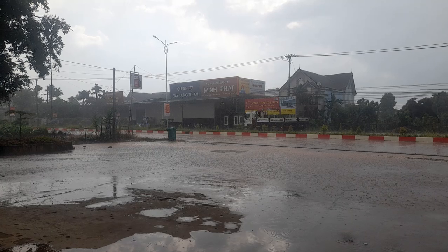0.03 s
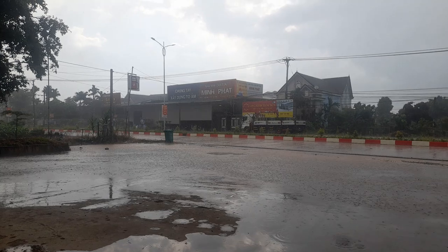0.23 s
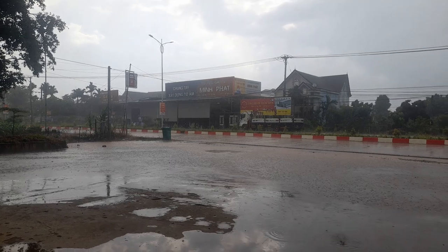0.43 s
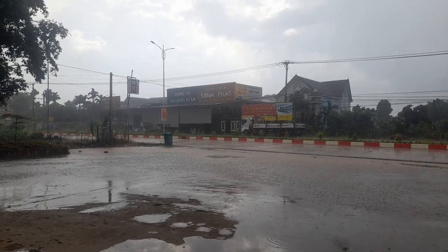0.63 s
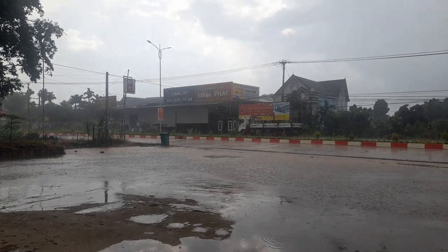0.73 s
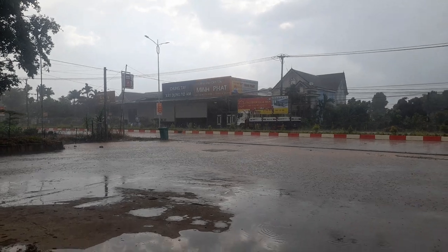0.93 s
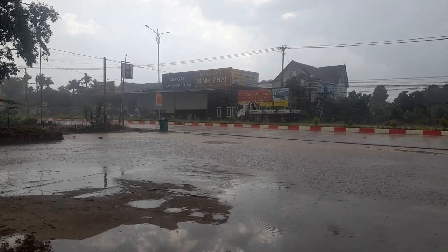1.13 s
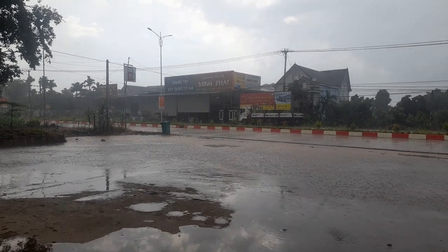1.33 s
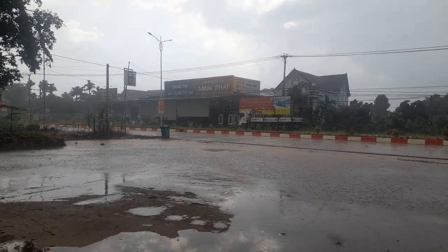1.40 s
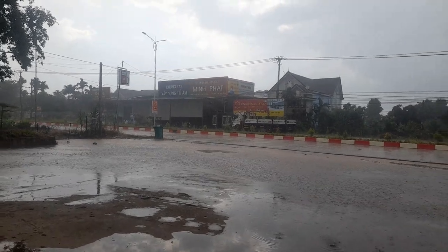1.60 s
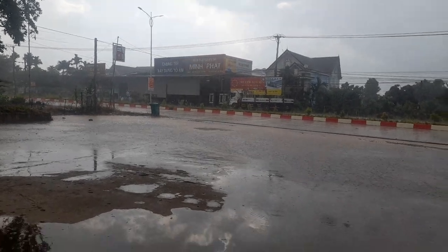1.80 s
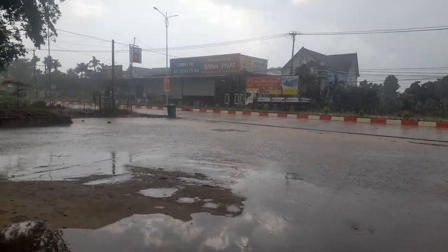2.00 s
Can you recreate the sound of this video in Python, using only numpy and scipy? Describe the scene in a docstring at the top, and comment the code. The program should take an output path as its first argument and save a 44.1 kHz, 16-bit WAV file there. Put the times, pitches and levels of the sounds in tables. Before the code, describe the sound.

Heavy rain hisses steadily on a flooded road, with a low rumble underneath.

```python
"""A wide hiss of heavy rain on a flooded road, heard from its edge on a small stereo microphone.
Countless far drops merge into the hiss, nearer ones tick on the water, a few big ones splash close by.
A low rumble lies underneath, and gusts buffet the microphone, mostly its left port.
Near the end comes one dull thump, and the treble fades on the right."""
import sys
import numpy as np
from scipy import signal
from scipy.fft import rfft, irfft
from scipy.io import wavfile
from scipy.ndimage import uniform_filter1d

SR = 44100
rng = np.random.default_rng(int(sys.argv[2]) if len(sys.argv) > 2 else 0)


def int16_out(signal):
    """Quantize to a 16-bit WAV file."""
    q = np.round(np.clip(np.atleast_2d(signal).T, -1, 1) * 32767)
    wavfile.write(sys.argv[1], SR, q.astype(np.int16))


N = 90449

# spectrum of rain on water at each port: frequency_hz, relative_db
RAIN_SPECTRUM_LEFT = [(100, -16), (450, -6), (750, -2), (1050, 0), (1400, -3), (2400, -5.5), (4500, -8),
                      (6200, -10.5), (7500, -9.5), (9100, -12), (11500, -10), (13800, -9.5), (16000, -14)]
RAIN_SPECTRUM_RIGHT = [(100, -34), (450, -5.5), (750, 1.5), (1100, -.5), (2500, -1.5), (3800, -2.5),
                       (5000, -4.5), (7500, -6.5), (8200, -9.5), (9000, -10), (9900, -6.5), (11200, -12),
                       (13800, -10.5), (16000, -16.5)]
# strength of the rain: time_s, gain_db
RAIN_STRENGTH = [(.07, 1.04), (.7, 0.9), (.9, 0.5), (1.1, 0), (1.33, 0.67), (1.68, 0.8), (1.85, 0.35),
                 (2.05, 0.5)]
# the rain's treble at the right port: time_s, gain_db
RIGHT_TREBLE_GAIN = [(.07, 1), (.4, -1.3), (1.1, 0.5), (1.35, 1.7), (1.72, 2), (1.85, -1), (1.95, -2.5),
                     (2.05, -9)]
# spectrum of the distant rumble: frequency_hz, relative_db
RUMBLE_SPECTRUM = [(15, -55), (30, -26), (50, -9.5), (100, -4.5), (160, -2.5), (250, 0), (340, -4),
                   (440, -7.5), (600, -5), (760, -4), (900, -9), (1100, -22), (2500, -34.5)]
# likeness of the rumble at the two ports: frequency_hz, correlation (0-1)
RUMBLE_LIKENESS = [(50, .6), (200, 0.92), (400, 0.93), (750, 0.5), (1200, 0.2)]
# spectrum of wind on the microphone: frequency_hz, relative_db
WIND_SPECTRUM = [(15, -50), (30, -16), (52, -2.5), (90, -4.5), (145, 2.5), (210, -9.5), (320, -11.5),
                 (600, -29), (1500, -35.5), (5000, -55)]
# gusts on the microphone: peak_s, half_length_s, left_db, right_db
WIND_GUSTS = [(0.135, 0.012, -17.5, -33), (0.184, .02, -12.5, -48), (0.267, 0.024, -24.5, -32),
              (0.611, 0.044, -17.5, -31.5), (0.689, 0.029, -16, -24), (0.759, 0.027, -21, -36),
              (1.022, 0.017, -24.5, -48), (1.789, 0.014, -18.5, -42), (1.87, 0.053, -31.5, -28),
              (1.966, 0.012, -19.5, -37), (2.036, .014, -21.5, -32)]
# big drops close by: start_s, relative_db, pitch_hz, left_minus_right_db
CLOSE_SPLASHES = [(.1453, -22, 12600, 6), (0.2754, -11, 6050, -4.5), (.5329, -22, 7800, 0),
                  (.6021, -22, 9400, 2), (.609, -22, 9200, -5), (.684, -18, 11400, 3),
                  (.6874, -20, 3600, -5), (.7069, -18, 5300, 0), (1.0327, -17, 13000, 3),
                  (1.165, -13.5, 7500, -5), (1.2784, -18.5, 3800, -5), (1.3617, -16.5, 3900, -5),
                  (1.5963, -22, 10200, -3)]

HISS_DB, DROPS_DB = -27, -38.5  # before the rain's strength and treble gain
RUMBLE_DB, SPLASH_GAIN_DB = -30.5, -4.5
BREEZE_LEFT_DB, BREEZE_RIGHT_DB = -38.5, -45  # between gusts


def amp(db):
    """Decibels to gain."""
    return 10 ** (np.asarray(db) / 20)


def unit(x):
    """Scales to rms 1."""
    return x / np.sqrt(np.mean(x ** 2) + 1e-20)


def per_bin(table):
    """Reads a table at every FFT bin, on a log-frequency axis."""
    hz, value = np.transpose(table)
    return np.interp(np.log(np.fft.rfftfreq(N, 1 / SR) + 1), np.log(hz + 1), value)


def gain_curve(table):
    """Turns a table of decibels over time into a gain at every sample."""
    return amp(np.interp(np.arange(N) / SR, *np.transpose(table)))


def colour(x, spectrum):
    """Filters a signal by a spectrum table."""
    return irfft(rfft(x) * amp(per_bin(spectrum)), N)


def drift(shape, bins, frames):
    """Random field, smooth over neighbouring bins and frames."""
    across_bins = uniform_filter1d(rng.standard_normal(shape), bins, axis=0)
    return unit(uniform_filter1d(across_bins, frames, axis=1))


def on_water(pair):
    """Gives each port its colour of rain on water."""
    return unit(np.array([colour(pair[0], RAIN_SPECTRUM_LEFT), colour(pair[1], RAIN_SPECTRUM_RIGHT)]))


def far_hiss(flutter_db=0.57, patchy_db=0.86):
    """Drops far out on the road merge into noise that flutters and comes in patches."""
    noise = signal.stft(rng.standard_normal((2, N)), nperseg=256)[2]
    flutter = drift((1, noise.shape[2]), bins=1, frames=12)
    patches = np.array([drift(port.shape, bins=14, frames=12) for port in noise])
    uneven = noise * amp(flutter_db * flutter + patchy_db * patches)
    return amp(HISS_DB) * on_water(signal.istft(uneven)[1][:, :N])


def near_drops(drops_per_s=1800, spread_db=4.5, decay_cycles=0.88, pitches=32):
    """Nearer drops tick on the water all around the microphone, each a few cycles long."""
    t, out = np.arange(256) / SR, np.zeros((2, N))
    sizes = amp(spread_db * np.minimum(rng.exponential(1, N), 4.4))  # many faint, few loud
    impacts = sizes * (rng.random(N) < drops_per_s / SR)
    pitch_index = rng.integers(0, pitches, N)
    for k, hz in enumerate(np.linspace(2400, 15000, pitches)):
        tick = np.exp(-t * hz / decay_cycles) * np.sin(2 * np.pi * hz * t)
        ticks = signal.oaconvolve(impacts * (pitch_index == k), unit(tick))[:N]
        pan, lag_samples = rng.uniform(0, np.pi / 2), rng.integers(-18, 19)  # one direction a pitch
        out += [np.cos(pan) * ticks, np.sin(pan) * np.roll(ticks, lag_samples)]
    return amp(DROPS_DB) * on_water(out)


def distant_rumble():
    """A low, steady roar from far off, nearly alike at both ports."""
    left, independent = rfft(rng.standard_normal((2, N)))
    likeness = per_bin(RUMBLE_LIKENESS)
    right = likeness * left + np.sqrt(1 - likeness ** 2) * independent
    pair = irfft(np.array([left, right]), N)
    return amp(RUMBLE_DB) * unit(colour(pair, RUMBLE_SPECTRUM))


def wind_on_microphone():
    """Eddies buffet each port separately, swelling with every gust."""
    t = np.arange(N) / SR
    power = amp([[BREEZE_LEFT_DB], [BREEZE_RIGHT_DB]]) ** 2
    for peak_s, half_length_s, left_db, right_db in WIND_GUSTS:
        swell = np.exp(-((t - peak_s) / half_length_s) ** 2)
        power = power + amp([[left_db], [right_db]]) ** 2 * swell
    eddies = colour(rng.standard_normal((2, N)), WIND_SPECTRUM)
    eddy_power = uniform_filter1d(uniform_filter1d(eddies ** 2, size=1200), size=600)
    return eddies * np.sqrt(power / eddy_power)


def close_splashes(snap_decay_s=0.00028, spray_decay_s=0.017, spray_db=-10.5, log_width=0.45):
    """Each big drop snaps on the water close to the microphone, then its spray falls back."""
    t, out = np.arange(4096) / SR, np.zeros((2, N))
    bin_hz = np.fft.rfftfreq(len(t), 1 / SR) + 1
    for start_s, relative_db, pitch_hz, pan_db in CLOSE_SPLASHES:
        band = 1 / np.sqrt(1 + (np.log(bin_hz / pitch_hz) / log_width) ** 4)
        spray = unit(irfft(rfft(rng.standard_normal((2, len(t)))) * band))
        snap = np.exp(-t / snap_decay_s) * (2 * np.sin(2 * np.pi * pitch_hz * t) + 0.5 * spray)
        splash = snap + amp(spray_db) * spray * np.exp(-t / spray_decay_s)
        port_gains = amp(relative_db + SPLASH_GAIN_DB) * amp([[pan_db / 2], [-pan_db / 2]])
        start = round(start_s * SR)
        out[:, start:start + len(t)] += port_gains * splash
    return out


def thump(centre_s=1.8848, half_length_s=0.0036, pitch_hz=175, gain_db=-12.5):
    """One short, dull push on both ports."""
    t = np.arange(N) / SR - centre_s
    return -amp(gain_db) * np.exp(-(t / half_length_s) ** 2) * np.sin(2 * np.pi * pitch_hz * t)


def scene(treble_hz=5460):
    """The roadside: rain, its treble swelling then dulling on the right, over rumble and wind."""
    left, right = (far_hiss() + near_drops()) * gain_curve(RAIN_STRENGTH)
    treble = signal.sosfiltfilt(signal.butter(2, treble_hz, "high", fs=SR, output="sos"), right)
    right = right + treble * (gain_curve(RIGHT_TREBLE_GAIN) - 1)
    return np.array([left, right]) + close_splashes() + distant_rumble() + wind_on_microphone() + thump()


def record(dry, start_s=0.0672, fade_in_s=0.002, cutoff_hz=15900):
    """The sound starts after a brief silence, with no treble above about 16 kHz."""
    fade_in = np.clip((np.arange(N) / SR - start_s) / fade_in_s, 0, 1)
    lowpass = signal.firwin(511, cutoff_hz, window=("kaiser", 9), fs=SR)
    return signal.oaconvolve(dry * fade_in, lowpass[None], "same")


dry = scene()
out = record(dry)
int16_out(out)
```